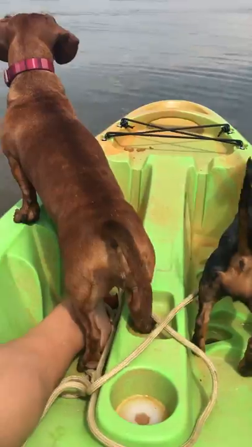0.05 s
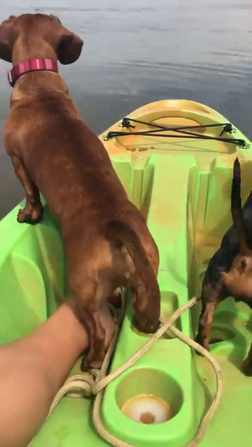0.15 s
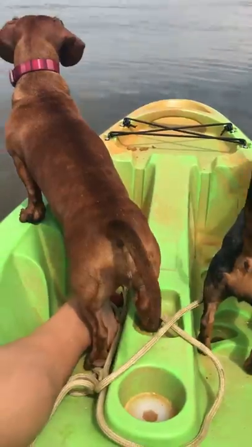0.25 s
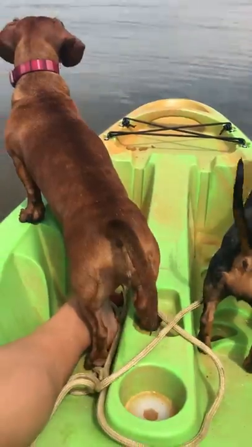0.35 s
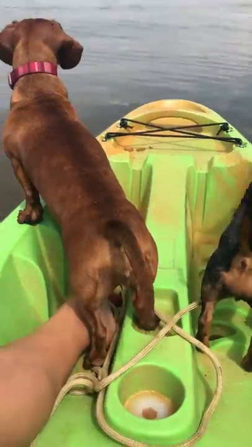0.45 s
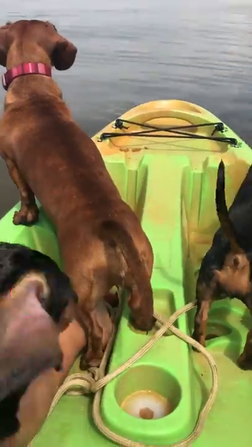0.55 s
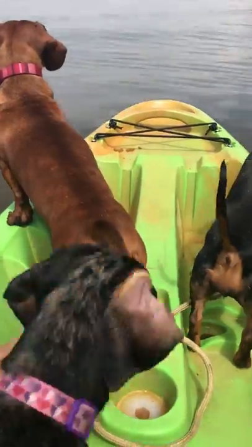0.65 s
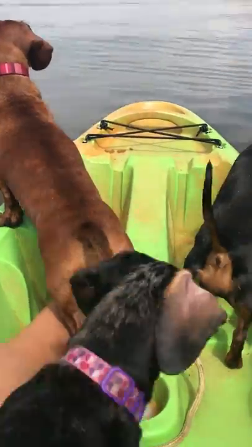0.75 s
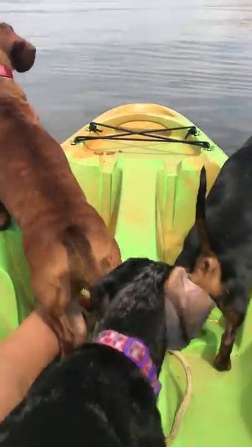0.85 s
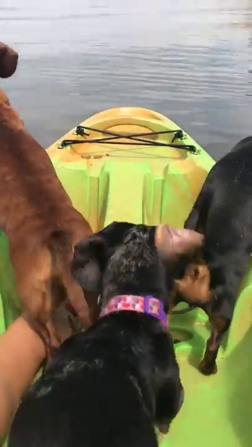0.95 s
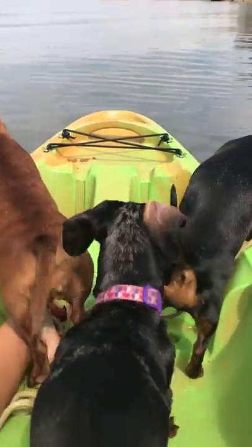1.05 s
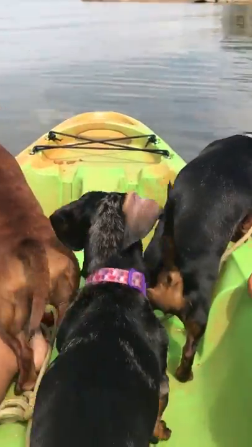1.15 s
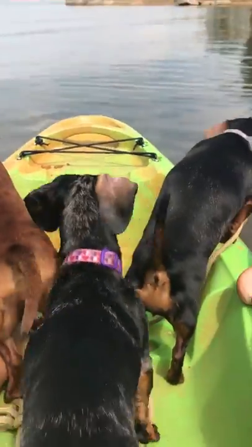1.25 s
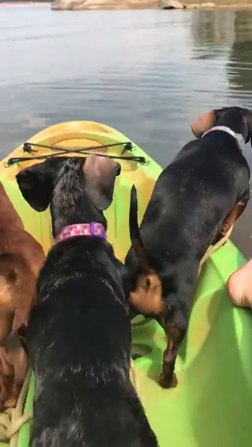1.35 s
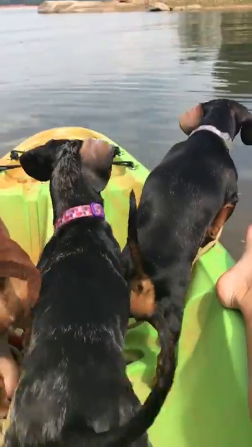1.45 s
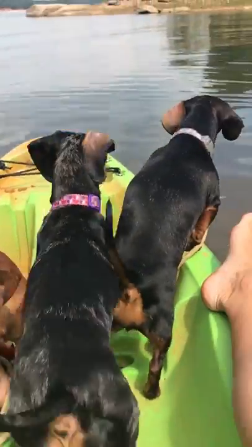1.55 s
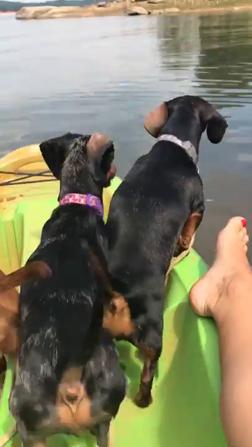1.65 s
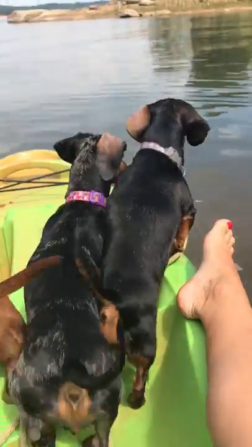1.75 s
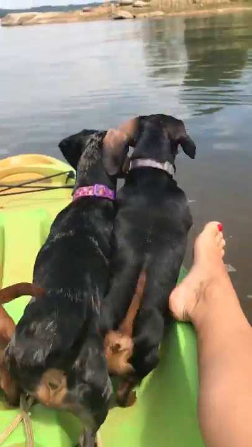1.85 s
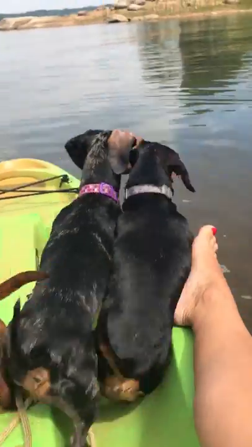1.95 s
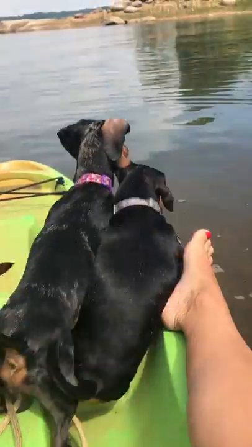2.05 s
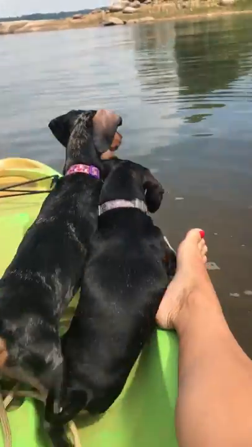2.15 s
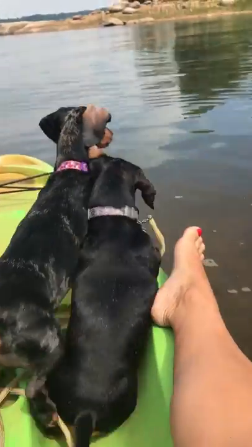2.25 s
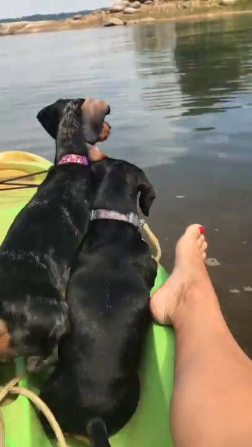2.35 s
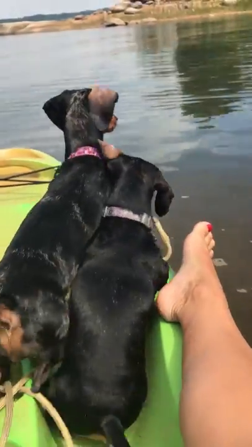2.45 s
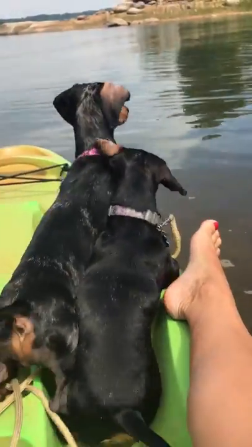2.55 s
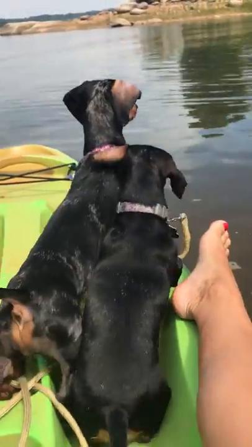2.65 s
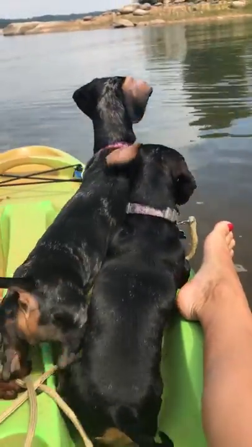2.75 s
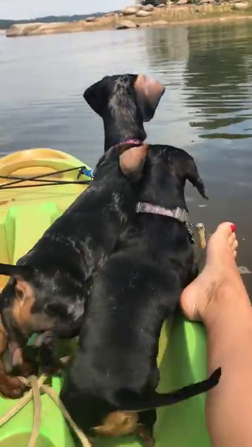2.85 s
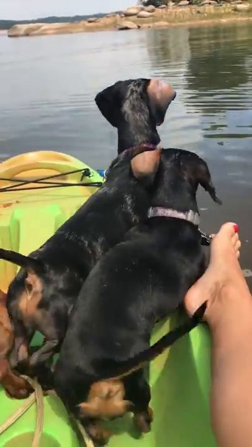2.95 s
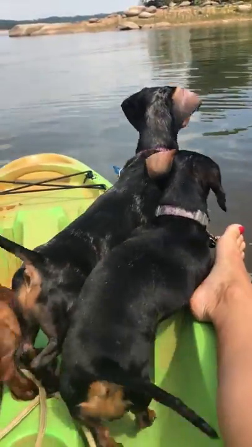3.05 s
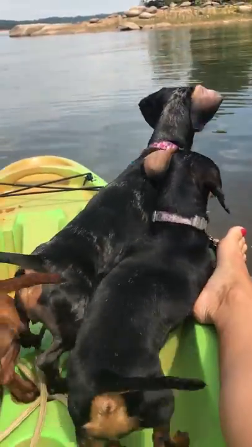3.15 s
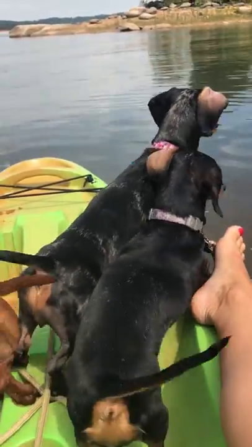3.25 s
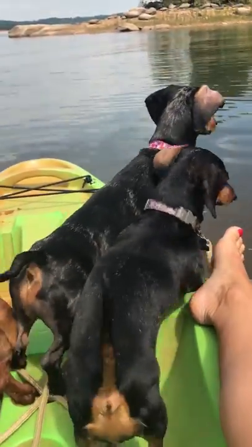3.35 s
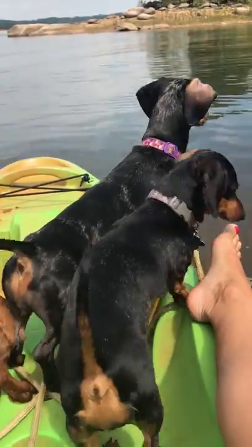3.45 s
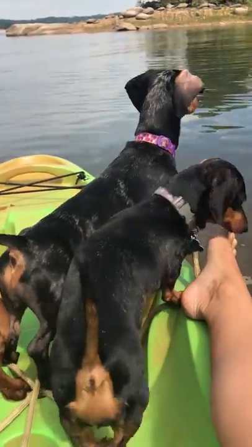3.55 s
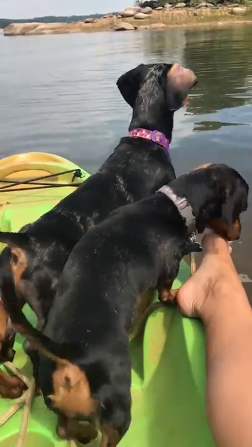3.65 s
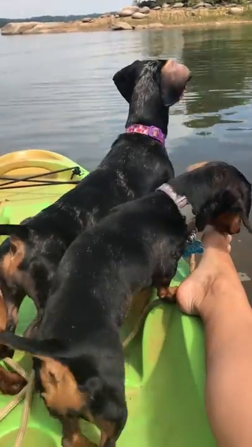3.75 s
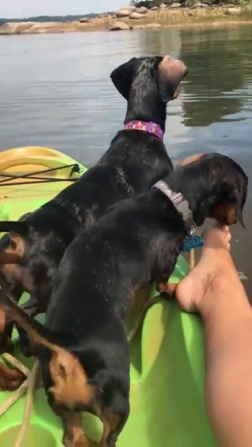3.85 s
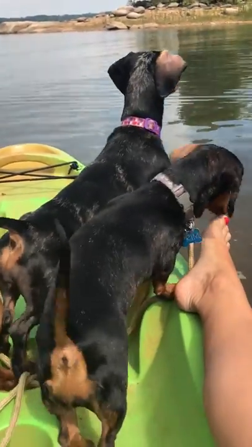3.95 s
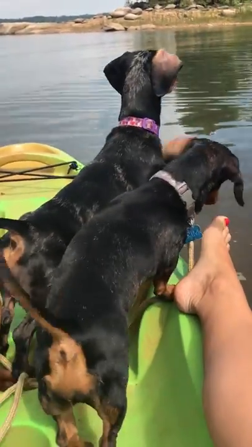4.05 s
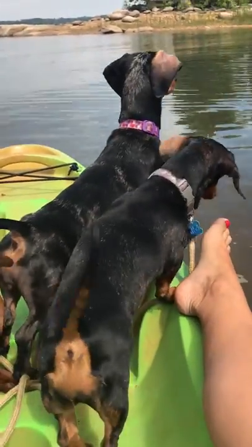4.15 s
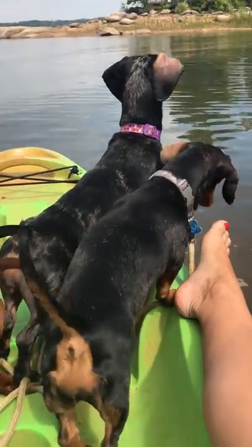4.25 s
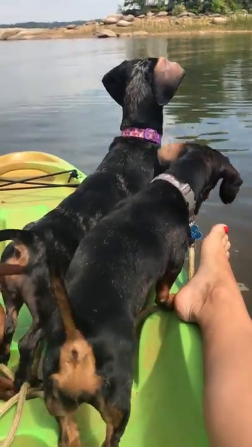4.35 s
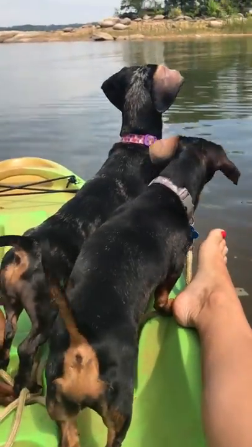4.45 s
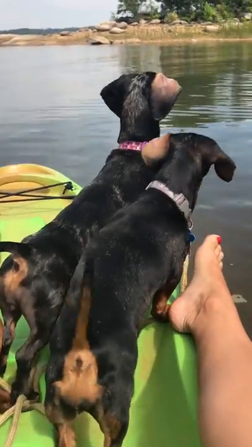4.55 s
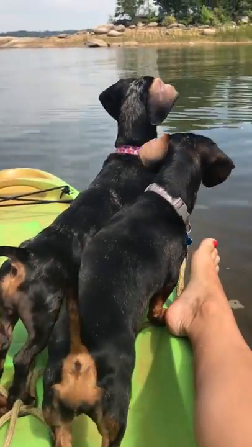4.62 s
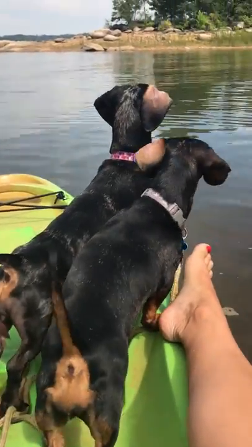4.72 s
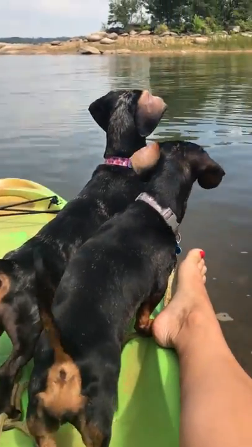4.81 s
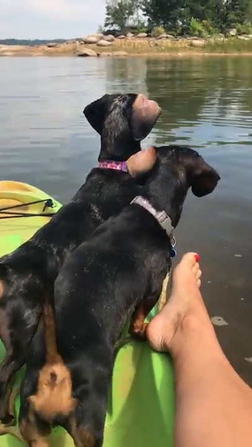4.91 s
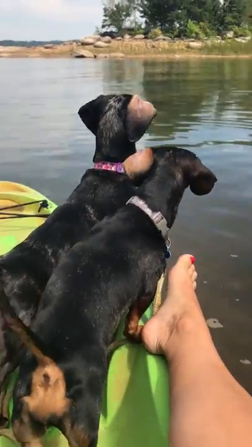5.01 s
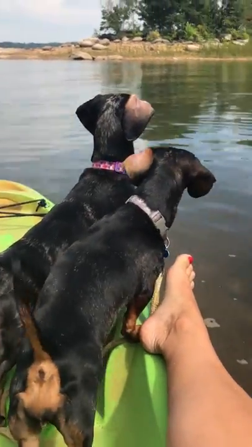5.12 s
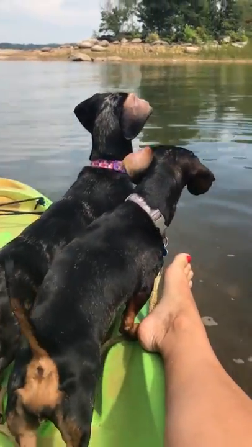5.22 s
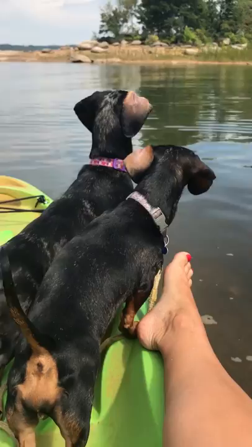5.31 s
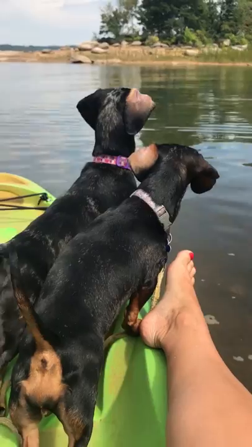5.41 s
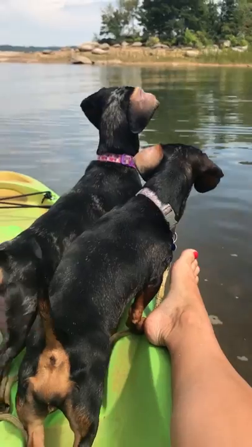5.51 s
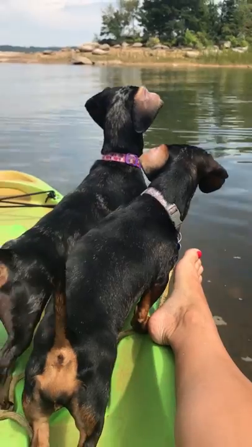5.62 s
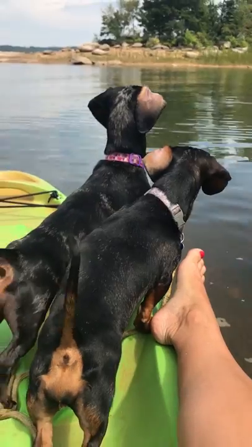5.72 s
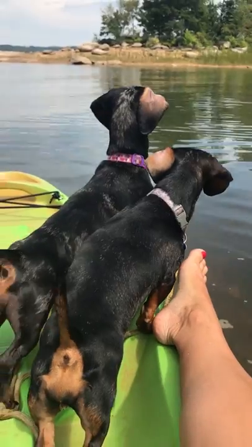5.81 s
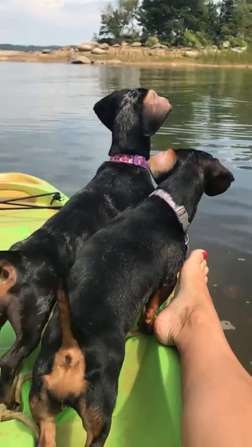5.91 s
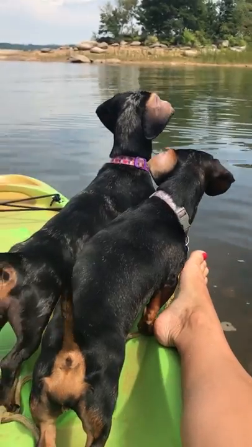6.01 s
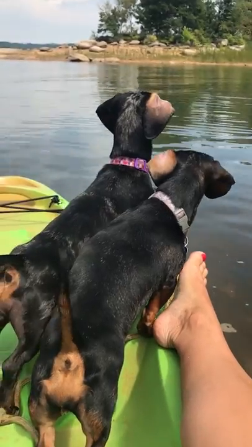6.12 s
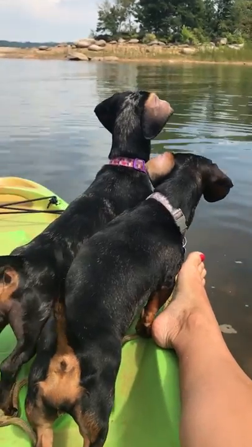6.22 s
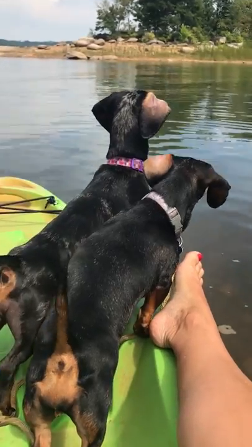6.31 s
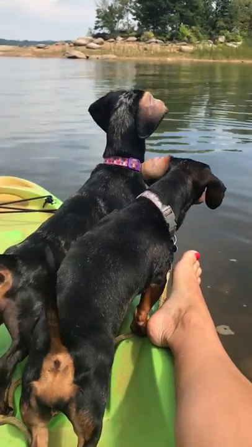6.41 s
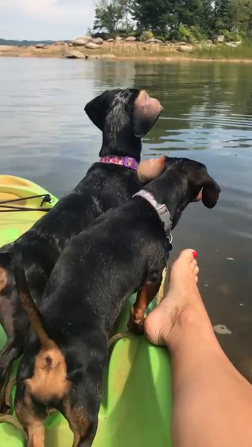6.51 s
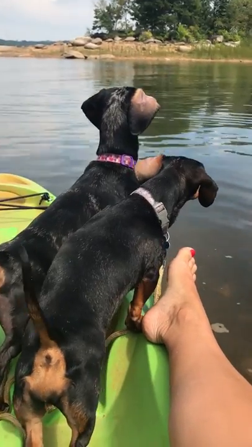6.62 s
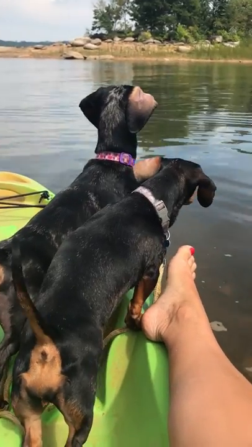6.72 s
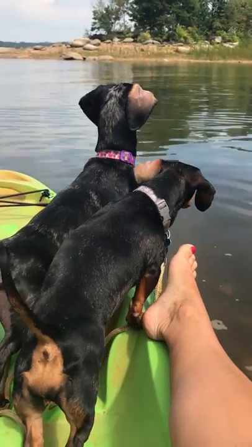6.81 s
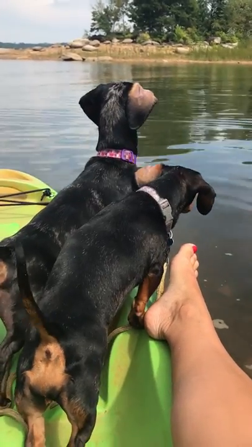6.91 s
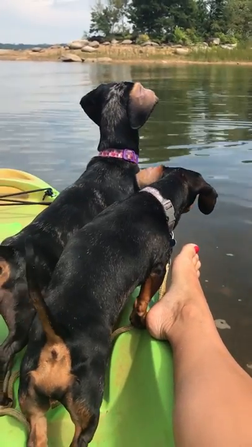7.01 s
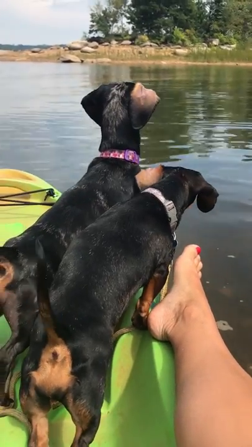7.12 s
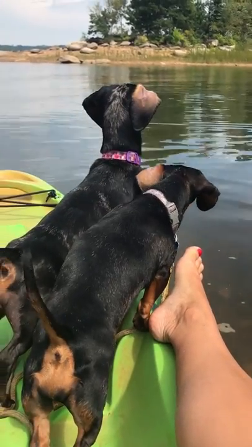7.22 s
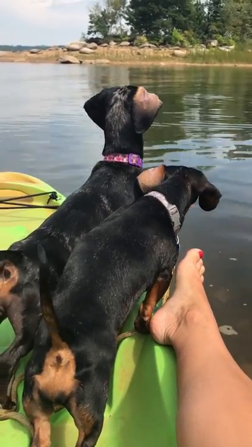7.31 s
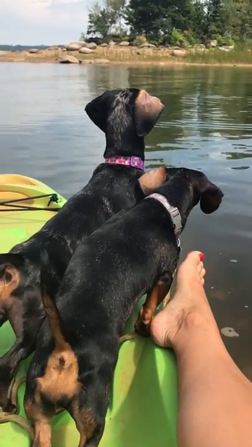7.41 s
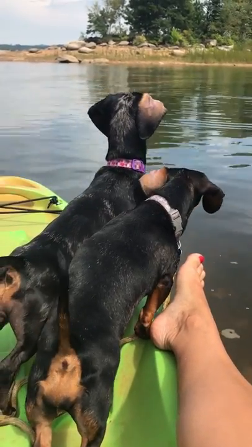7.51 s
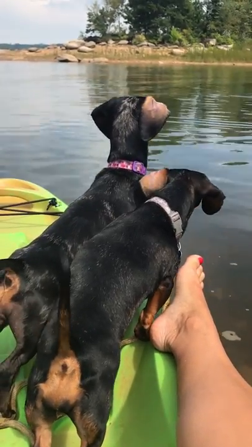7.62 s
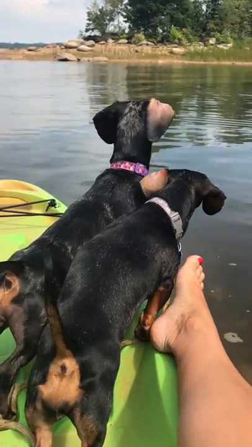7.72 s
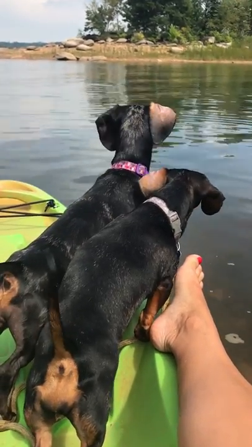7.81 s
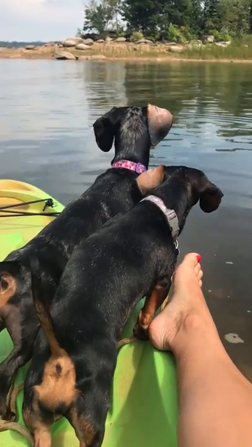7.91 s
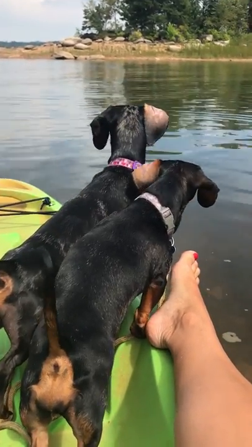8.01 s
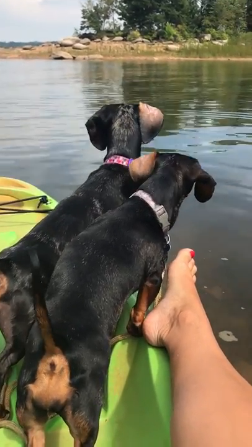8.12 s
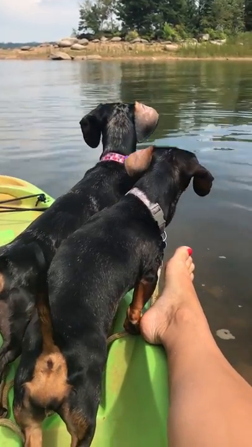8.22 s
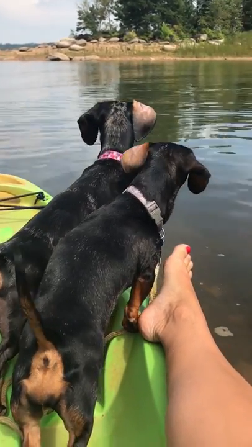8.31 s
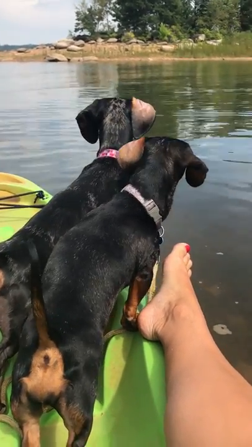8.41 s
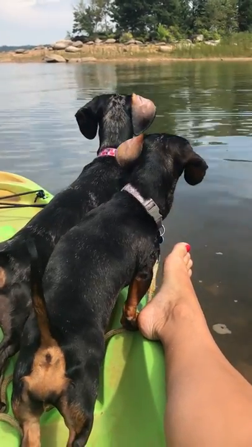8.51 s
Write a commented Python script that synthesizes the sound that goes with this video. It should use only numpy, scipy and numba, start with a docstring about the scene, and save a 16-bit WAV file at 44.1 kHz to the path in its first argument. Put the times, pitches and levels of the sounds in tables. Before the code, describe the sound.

A close phone microphone on a calm lake, dry open air. For the first 0.6 seconds there is a soft distant hush, a faint high insect whine and a few light tag clinks and paw bumps. From about 0.7 to 1.7 seconds, collar tags jingle rapidly, very bright and short, strongest near 0.9 to 1.0, as claws click and paws thump the hollow plastic kayak. A heavy thump lands around 1.6. Until 2.9, claws tick and skid grittily, the hull booms and rumbles, strongest near 2.0, with sparser clinks. Steps and scrapes thin out by 3.6 and nearly stop after 4.3. Then small ripples lap, with a sharp watery tick at 5.6 and plops around 6.5, 7.0 and 7.7 to 7.9. Tiny falling sniffs come at 4.6, 5.2, 7.1 and 8.5, with faint late bumps near 5.6 and 6.1; the insect whine wavers throughout.

```python
"""A calm lake: small dogs shuffle on a hollow plastic kayak, close to a phone's microphone.
Collar tags clink as fluttering high modes, claws tick and skid as gritty noise bursts, paws thump
the hull's low modes; then the dogs settle, with a few late steps, and a dog sniffs in gliding hiss.
All along, ripples plop and tick as short rising tones, an insect whines as a thin tone with its
octave, and the far shore hushes as smooth noise."""
import sys
import numpy as np
from scipy import signal
from scipy.fft import rfft, irfft
from scipy.io import wavfile
from scipy.ndimage import uniform_filter1d
from numba import njit

SR = 44100
rng = np.random.default_rng(int(sys.argv[2]) if len(sys.argv) > 2 else 0)


def field_ratio(decibels):
    """Amplitude ratio for a level in dB (20 dB per decade); scalars and array-likes work."""
    return 10 ** (np.asarray(decibels, dtype=float) / 20)


def master_out(mix):
    """Clip the mix to full scale and print it as 16-bit PCM to the path in sys.argv[1]."""
    frames = np.transpose(np.atleast_2d(mix))
    ceiling = np.clip(frames, -1, 1)
    pcm = np.round(ceiling * 32767).astype(np.int16)
    wavfile.write(sys.argv[1], SR, pcm)


N = 377760
T = np.arange(N) / SR
CAVITY_HZ = 81.4  # the air inside the hull booms most


def add(out, s, sound):
    """Mix a sound in at a moment."""
    i = int(s * SR)
    out[i:i + len(sound)] += sound[:N - i]


def fade(t, t60):
    """Exponential decay of 60 dB in t60."""
    return np.exp(-np.log(1000) * t / t60)


def unit(x):
    """Scale to rms 1."""
    return x / np.sqrt(np.mean(x ** 2))


def colour(x, points):
    """Shape by (frequency [Hz], level [dB]) points on a log-frequency axis; rms 1."""
    hz, db = np.transpose(points)
    f = np.arange(len(x) // 2 + 1) * SR / len(x) + 1
    gain = field_ratio(np.interp(np.log(f), np.log(hz), db))
    return unit(irfft(rfft(x) * gain, len(x)))


def walk(rate):
    """Random levels held 1 / rate s and slewed twice; spread near 1."""
    k = int(SR / rate)
    held = np.repeat(rng.standard_normal(N // k + 1), k)
    return 1.3 * uniform_filter1d(uniform_filter1d(held, k), k)[:N]


def curve(table, index):
    """One column of a table as gain over time, silent after its end."""
    rows = np.array(table)
    return field_ratio(np.interp(T, rows[:, 0], rows[:, index], right=-120))


def grains(spread_db, size):
    """Noise in short steps of size samples, a few of them much stronger."""
    steps = np.minimum(rng.exponential(size=N // size + 1), 5)
    return rng.standard_normal(N) * field_ratio(spread_db * steps).repeat(size)[:N]


@njit
def svf(x, hz, q):
    """State-variable band-pass with a moving centre."""
    y, b, l = np.empty(len(x)), 0., 0.
    for i in range(len(x)):
        g = np.tan(np.pi * hz[i] / SR)
        v = (b + g * (x[i] - l)) / (1 + g * (g + 1 / q))
        b, l, y[i] = 2 * v - b, l + 2 * g * v, v / q
    return y


def shore(level_db=-52.5, treble_db=-3):
    """Far water and air: a hush that drifts a little; the boat's rocking makes the bass come and go."""
    # spectrum of the hush: (frequency [Hz], relative level [dB per Hz])
    hush_spectrum = [(25, 1.5), (60, 5.5), (124, 1), (259, -6.5), (470, -5.5), (979, -5.5), (2040, -13.5),
                     (3230, -16.5), (4860, -19), (10400, -31), (14400, -29.5), (16500, -36)]
    drift_db = .7 * walk(3)
    hush = colour(rng.standard_normal(N), hush_spectrum)
    bass = signal.sosfilt(signal.butter(2, 300, fs=SR, output="sos"), hush)
    treble = field_ratio(treble_db) * (hush - bass)
    return field_ratio(level_db + drift_db) * (treble + bass * field_ratio(2.6 * walk(14)))


def insect(wing_hz=3180, octave_db=-11):
    """A thin wing tone with its octave comes and goes; twice a peep glides a little above it."""
    # insect flight, before the flicker: (time [s], wing tone level [dB])
    flight = [(0, -71), (4.6, -79), (5.7, -77), (5.95, -70), (6.3, -79), (6.8, -74), (7.3, -81), (7.9, -77),
              (8.2, -72.5), (8.57, -76)]
    # thin gliding tones, before the flicker:
    # (time [s], length [s], peak level [dB], start [Hz], end [Hz])
    peeps = [(4.98, .22, -65.5, 3430, 3250), (8.28, .26, -71.5, 3310, 3420)]
    phase = 2 * np.pi * np.cumsum(wing_hz * (1 + 0.000902 * walk(6))) / SR
    wing = np.sin(phase) + field_ratio(octave_db) * np.sin(2 * phase)
    out = curve(flight, index=1) * np.sqrt(2) * wing
    for s, length, db, start_hz, end_hz in peeps:
        u = np.arange(int(length * SR)) / int(length * SR)
        glide = np.cumsum(start_hz + (end_hz - start_hz) * u ** 2) / SR
        swell = np.sqrt(np.sin(np.pi * np.sqrt(u)))
        add(out, s, field_ratio(db) * np.sin(2 * np.pi * glide) * swell)
    return out * field_ratio(2.5 * walk(25))  # the level flickers


def shuffle(flicker_db=5.0, scrape_db=-0.5, scrape_hz=1900, roam_octaves=0.97, stutter_db=5):
    """Pads and fur rub in grains, claws drag in stutters; shifting weight keeps the hull rumbling."""
    # shuffling, before flicker: (time [s], pad rustle level [dB], hull rumble level [dB])
    shuffling = [(0.0, -65, -54.5), (0.66, -57, -59), (1.18, -55, -51.5), (1.7, -52.5, -50.5),
                 (1.98, -45.5, -38), (2.25, -53, -49), (3.08, -53.5, -45), (3.55, -59, -54.5),
                 (4.4, -72, -71)]
    # spectrum of the rubbing: (frequency [Hz], relative level [dB per Hz])
    rub_spectrum = [(300, -12), (800, 7.5), (2500, 0), (5000, -0.5), (9000, -6.5), (15500, -5.5)]
    rustle = colour(grains(3, size=90), rub_spectrum) * field_ratio(flicker_db * walk(30.06))
    # the dragging claws pass over changing spots
    spot_hz = np.clip(scrape_hz * 2 ** (roam_octaves * walk(28)), 0, SR / 4)
    scrape = svf(grains(2.8, size=40), spot_hz, 1.87) * field_ratio(stutter_db * walk(60))
    rustle = rustle + field_ratio(scrape_db) * unit(scrape)
    rumble = colour(rng.standard_normal(N), [(30, -11.0), (70, 4.0), (150, -9.5), (320, -6.5),
                                             (600, -19.5), (2000, -46.0)])
    rumble = rumble * field_ratio(flicker_db * walk(18))
    return curve(shuffling, index=1) * rustle + curve(shuffling, index=2) * rumble


def ripples(rate=190, small_db=-59.5, spread_db=4.6, cycles=26, glide=5, fizz_db=-67):
    """Trapped bubbles: short rising tones, a few strong among many faint (rate per s), and a soft fizz."""
    # clear plops and short ticks: (time [s], level [dB], starting frequency [Hz])
    plops_and_ticks = [(5.259, -38, 2400), (5.321, -43, 1388), (5.588, -28, 3600), (6.485, -40.5, 1150),
                       (6.531, -39, 950), (6.948, -36.5, 2390), (7.085, -37, 1850), (7.683, -36, 1600),
                       (7.766, -38.5, 960), (7.789, -38.5, 1070), (7.849, -42, 1095), (7.935, -43, 2150)]
    # how busily the ripples lap: (time [s], level on top of the faint bubbles and fizz [dB])
    lapping = [(0, -8), (4.5, 4.5), (5.4, -2), (6.2, 8), (6.6, 0.5), (7.1, 5), (7.75, 4), (8.1, 2),
               (8.57, -15)]
    out, t = np.zeros(N), T[:1500]
    cluster_db = 3.5  # bubbles come in clusters
    busy_db = np.interp(T, *np.transpose(lapping)) + cluster_db * walk(9.6)
    moment, strength, pitch = rng.random((int(rate * N / SR), 3)).T
    hz = 650 * 2 ** (2.7 * pitch)
    size_db = np.minimum(-spread_db * np.log(strength), 13)
    # bubbles far from 1500 Hz are fainter
    faint_db = small_db + size_db + busy_db[(moment * (N - 1)).astype(int)] - 2.2 * np.log2(hz / 1500) ** 2
    faint = np.c_[moment * T[-1], faint_db, hz]
    for s, db, hz in np.r_[plops_and_ticks, faint]:
        tone = np.sin(2 * np.pi * hz * (t + glide * t ** 2))
        add(out, s, field_ratio(db) * tone * fade(t, cycles / hz) * np.minimum(t / 0.0014, 1))
    fizz = colour(grains(3.3, size=220), [(900, -8), (2400, 0), (5000, -13), (15000, -28)])
    return out + field_ratio(fizz_db + busy_db) * fizz


def tags(scatter_db=9, drift=0.0026, rise_s=0.0011, flutter_db=7, crack_db=-11, crack_t60=0.035,
         bounce_db=-7, bounce_s=.014, weak_t60=0.9, split=.008):
    """Each clink cracks, bounces on its ring and sounds the same modes until the next contact."""
    # tag strikes: (time [s], level [dB], lean of the second mode over the first [dB],
    # edge: level of the other modes [dB], t60 of the two main modes until fur damps them [s])
    strikes = [(.2091, -42.5, 30, -13, 0.05), (.3068, -38.5, 3, -5, 0.071), (.3368, -24, -14, -40, 0.031),
               (.6769, -30.5, -23, -17, 0.017), (.6856, -30, -20, -12, 0.014),
               (.7493, -33.5, -13, -16, 0.047), (.8045, -35, -8, -1, 0.15), (.8329, -34.5, -17, -24, 0.11),
               (.9215, -11, 7.5, -2, 0.014), (.9396, -25.5, -6, 0, 0.11), (.9942, -7, -34.5, -28, 0.021),
               (1.0144, -21, -3, -22, 0.02), (1.0351, -40, 3, -5, 0.0495), (1.0964, -23, -16, -10, 0.039),
               (1.1165, -28.5, -12, -20, 0.057), (1.173, -26.5, -5, -15, 0.04),
               (1.2117, -19, -4.5, 4, 0.02), (1.2344, -29, -10, -5, .055), (1.2458, -34, 15, 8, 0.044),
               (1.2601, -28, -21, 2, 0.14), (1.2733, -23, 7, -8, 0.043), (1.2962, -36.5, 19, 3, 0.11),
               (1.3269, -19, 30, 0, 0.022), (1.3625, -15, -18.5, -12, 0.04), (1.3837, -26, -11, -24, 0.018),
               (1.3998, -20, 10, -6, 0.023), (1.5033, -43, 1, 4.5, 0.1), (1.6369, -24, 0, 7, 0.033),
               (1.6536, -36, 19, 9, 0.052), (1.6867, -39, -4, -10, 0.066), (1.7211, -23, -4, 9.5, 0.025),
               (1.935, -39, -18.5, -27, 0.073), (2.066, -37.5, -3, 13, 0.056), (2.2252, -31.5, 9, 2, 0.04),
               (2.2467, -28, -19, -22, 0.012), (2.266, -53, -1, 10, 0.27), (2.3002, -26, -4, 3.5, 0.053),
               (2.336, -43, 14, -4, 0.13), (2.4016, -36, -17, -24, 0.031), (2.433, -45, 5, 22, 0.024),
               (2.6988, -22, 29, 1, 0.031), (3.0324, -35, -36, -38, 0.033), (3.0669, -47, -15, 0, 0.053),
               (3.4765, -31, -34.5, -16.5, 0.032), (3.9856, -48, 15, -13, .024)]
    # the three main modes: nominal frequency [Hz]
    main_hz = [11935, 10410, 15130]
    # weaker modes: (nominal frequency [Hz], level before random scatter [dB])
    weak_modes = [(6100, -7.5), (13860, -5.5), (14530, -15.5), (3770, -14)]
    low_hz, low_db = 8520, -2  # sounds along with the third mode, dB beside it before scatter
    # as the dog turns away, the third mode gives way to the weaker ones
    turn_s, turn_db_per_s = 0.88, 14.5
    out, t = np.zeros(N), T[:SR // 7]
    chance = rng.standard_normal((len(strikes), 4, 8))
    weak_hz, weak_db = np.transpose(weak_modes)
    crack = colour(grains(2.16, size=50), [(3000, -1.5), (7000, 10.5), (11000, 21), (16000, 4.5)])
    flutter = np.array([walk(220) for _ in range(8)])
    for k, (s, strike_db, lean_db, edge_db, t60) in enumerate(strikes):
        detune, scatter, phase, uneven = chance[k]
        now = slice(int(s * SR), int(s * SR) + len(t))
        turned_db = turn_db_per_s * (s - turn_s)
        third_db = edge_db - max(turned_db, 0)
        main_db = strike_db + np.array([min(-lean_db, 0), min(lean_db, 0), third_db])
        rest_db = strike_db + edge_db + min(turned_db, 0)
        minor_db = np.r_[main_db[2] + low_db, rest_db + weak_db] - scatter_db * abs(scatter[3:])
        hz = np.r_[main_hz, low_hz, weak_hz] * (1 + drift * detune)
        db = np.r_[main_db, minor_db]
        decay = max(t60, .01) * np.where(np.arange(len(hz)) < 2, 1, weak_t60)[:, None]
        # an uneven tag rings each mode as a close pair that beats
        turns = 2 * np.pi * np.outer(hz, t) + 3 * phase[:, None]
        partner = np.tanh(uneven[:, None]) * np.sin(turns * (1 - split * phase[::-1, None]))
        modes = (np.sin(turns) + partner) * fade(t, decay)
        # the strike is firm; then each mode flutters on its own as the tag swings and grazes its ring
        swing_db = flutter_db * flutter[:, now] * np.minimum(t / 0.007, 1)
        ring = field_ratio(db) @ (modes * field_ratio(swing_db))
        until = strikes[k + 1][0] - s if k + 1 < len(strikes) else 1
        # three ever weaker bounces at uneven gaps
        later = t - np.cumsum(bounce_s * (.5 + abs(uneven[:3])))[:, None]
        bounces = field_ratio(bounce_db * np.arange(1, 4)) @ ((later > 0) * fade(abs(later), crack_t60 / 2))
        hit = field_ratio(max(db) + crack_db) * crack[now] * (fade(t, crack_t60) + bounces)
        stopped = ring * fade(np.maximum(t - until, 0), 0.019)
        add(out, s, (stopped + hit) * np.minimum(t / rise_s, 1))
    return out


def paws(width_octaves=0.92, scatter_db=3, bloom=0.23, slap_cycles=2.3, slap_db=7, knock_t60=0.073,
         cavity_db=5, deck_db=5):
    """The pad slaps, the stiff deck knocks, then hull modes near the centre bloom, low ones last."""
    # paw thumps: (time [s], level [dB], centre frequency [Hz])
    thumps = [(.253, -41.5, 248), (0.318, -35, 286), (0.56, -38, 427), (.856, -28, 141),
              (.885, -26.5, 91.5), (.921, -22, 273), (.952, -24, 267), (.972, -32.5, 107.6),
              (1.106, -36.5, 256), (1.152, -26, 116), (1.228, -37.5, 248), (1.296, -34, 212),
              (1.341, -28, 487), (1.405, -29, 113), (1.507, -27.5, 238), (1.56, -28.5, 230),
              (1.605, -25, 141), (1.628, -14.5, 147), (1.689, -27, 106), (1.788, -26.5, 161),
              (1.92, -21, 210), (1.953, -34, 195), (1.978, -22.5, 234), (2.04, -23, 154), (2.122, -18, 186),
              (2.371, -31.5, 241), (2.404, -35, 149), (2.524, -23, 260), (2.612, -25, 146),
              (2.624, -27, 210), (2.812, -34, 330), (2.851, -17, 250), (3.165, -32, 272),
              (3.233, -30.5, 296), (3.262, -20, 252), (3.659, -37.5, 70), (3.817, -37.5, 170),
              (4.567, -46.5, 73.2), (5.648, -38, 81), (6.103, -41, 207), (6.164, -41.5, 77.4)]
    # hull modes: (nominal frequency [Hz], t60 [s])
    hull_modes = [(60.7, 0.516), (CAVITY_HZ, 0.33), (100, 0.2), (145, 0.17), (170, 0.19), (232, 0.168),
                  (280, 0.12), (335, 0.12), (430, 0.11), (560, 0.086), (825, 0.045), (630, 0.11),
                  (1200, 0.093)]
    # knock beside a -12.5 dB thump centred on 200 Hz; stiffer spots and harder steps knock more
    knock_db, knock_db_per_octave, knock_per_db = -6.5, 3.5, .5
    out, t = np.zeros(N), T[:SR // 3]
    hz, t60 = np.transpose(hull_modes)[:, :, None]
    chance = rng.standard_normal((len(thumps), 3, len(hull_modes), 1))
    deck = colour(rng.standard_normal(N), [(250, -8.5), (600, -2), (1000, -0.5), (1600, -15), (5000, -37.0)])
    for (s, db, centre), (size, tune, phase) in zip(thumps, chance):
        mode_db = scatter_db * size + cavity_db * (hz == CAVITY_HZ) + deck_db * (hz > 560)
        gain = field_ratio(mode_db) / (1 + (np.log2(hz / centre) / width_octaves) ** 2)
        modes = np.sin(2 * np.pi * hz * (1 + 0.044 * tune) * t + 1.55 * phase)
        ring = gain * modes * fade(t, t60) * (1 - np.exp(-t * hz / bloom))
        ring = ring.sum(axis=0) / np.sqrt(np.sum(gain ** 2))
        slap = field_ratio(slap_db) * np.sin(2 * np.pi * centre * t) * fade(t, slap_cycles / centre)
        beside_db = knock_db + knock_db_per_octave * np.log2(centre / 200) + knock_per_db * (db + 12.5)
        knock = field_ratio(beside_db) * deck[int(s * SR):][:len(t)] * fade(t, knock_t60)
        knock = knock * np.minimum(t / 0.00068, 1)
        add(out, s, field_ratio(db) * (ring + slap + knock))
    return out


def claws(width_octaves=1.0, grit_db=3.0, lumps_db=3, skid_ms=90, tail=1.04):
    """A claw scrapes over pebbled plastic in a gritty burst; each spot has its own resonances."""
    # claw ticks and skids: (time [s], level [dB], centre frequency [Hz], length scale [ms], 1 at least)
    touches = [(0.3169, -40.5, 2620, 6.1), (0.64, -40, 5100, 10.4), (.725, -45.5, 6000, 12),
               (0.859, -29, 4800, 4), (0.8711, -21.5, 4940, 2.9), (0.876, -29, 3660, 4.8),
               (0.917, -24.5, 4900, 13.3), (0.94, -38.5, 6500, 27), (0.971, -35, 4840, 8),
               (0.991, -37, 9100, 5.2), (1.013, -32, 7780, 10.4), (1.035, -44, 8000, 28),
               (1.105, -42, 4060, 28), (1.171, -39, 3720, 14), (1.204, -26, 5870, 4),
               (1.233, -35, 8050, 4.7), (1.326, -36.5, 5400, 13.6), (1.344, -32.5, 4350, 9.4),
               (1.354, -33, 6960, 13), (1.3955, -27.5, 5770, 6.4), (1.474, -27, 8200, 7.5),
               (1.581, -39, 4600, 6.3), (1.611, -29, 4960, 8.5), (1.6293, -24.5, 4700, 9.5),
               (1.7265, -34, 5430, 7.5), (1.79, -35, 5770, 11), (1.812, -36.5, 2480, 5.6),
               (1.862, -33, 2700, 15.4), (1.882, -35, 1140, 13.7), (1.883, -26.5, 3760, 3.5),
               (1.918, -20, 4400, 7), (1.978, -26.5, 3670, 5.1), (2.015, -32, 4370, 7.2),
               (2.0309, -16, 6040, 2.6), (2.044, -29.5, 1450, 6.8), (2.1222, -31, 1300, 2.1),
               (2.136, -37.5, 3550, 14), (2.149, -33, 5400, 6.8), (2.297, -33, 6200, 3.7),
               (2.3234, -37, 4360, 6.2), (2.374, -19, 5100, 3.4), (2.3983, -38, 4500, 5.8),
               (2.464, -39.5, 4780, 3.8), (2.5122, -24.5, 4300, 1.9), (2.5181, -18, 4270, 11.4),
               (2.54, -42.5, 950, 39), (2.695, -41, 5700, 3.7), (2.763, -34.5, 1420, 34),
               (2.8512, -40, 1280, 2.2), (2.972, -44.5, 3950, 9.2), (3.051, -31.5, 3600, 5.7),
               (3.075, -42, 4000, 5.3), (3.1045, -39, 5500, 2.2), (3.132, -32, 3340, 31.5),
               (3.229, -29, 4200, 3.6), (3.253, -32.5, 1900, 34.7), (3.313, -38, 9000, 3.2),
               (3.335, -37.5, 3770, 11.3), (3.476, -45, 11000, 3.2), (3.502, -37.5, 3760, 4),
               (3.52, -26.5, 7300, 0.96), (3.533, -42, 2700, 32.6), (3.814, -39.5, 1730, 8),
               (3.985, -37, 6500, 2.3), (4.025, -48.5, 2920, 16), (4.197, -46.5, 7000, 2),
               (4.283, -40, 4000, 0.74), (5.577, -47, 3500, 4.5), (6.091, -55.5, 4400, 60)]
    out, t = np.zeros(N), T[:6000]
    chance = rng.standard_normal((len(touches), 3, len(t)))
    f = np.arange(len(t) // 2 + 1) * SR / len(t) + 1
    for (s, db, hz, ms), (noise, grit, spot) in zip(touches, chance):
        # a tick starts quickly on one spot; a long skid swells slowly and smears the resonances
        skid = min(ms / skid_ms, .6)
        lumps = field_ratio((1.5 - skid) * lumps_db * unit(uniform_filter1d(spot[:len(f)], size=70)))
        shape = lumps / (1 + (np.log2(f / hz) / (width_octaves + skid)) ** 2)
        shape = shape / np.hypot(1, f / (3.1 * hz))
        gritty = noise * field_ratio(grit_db * unit(uniform_filter1d(grit, size=30)))
        burst = irfft(rfft(gritty) * shape)
        u, rise = t * 1000 / max(ms, 1), 0.43 + skid
        swell = np.sin(np.pi / 2 * np.minimum(u / rise, 1)) ** 2
        swell = swell * np.exp(-tail * (1 + 4 * skid) * np.maximum(u - rise, 0) ** 1.3)
        level = field_ratio(db) * np.linalg.norm(swell) / np.linalg.norm(burst * swell)
        add(out, s, level * burst * swell)
    return out


def sniffs(q=3.2, tail_db=7, spread=.08):
    """Air through the nostrils: a grainy hiss in two neighbouring resonances that fall and fade."""
    # sniffs: (time [s], level before the fades [dB], nominal start [Hz], nominal end [Hz], length [s])
    breaths = [(4.632, -49.5, 4700, 2300, 0.081), (5.152, -53.5, 5300, 1200, 0.074),
               (7.117, -52.5, 4970, 1900, 0.08), (8.486, -51.5, 4880, 1500, 0.064)]
    out = np.zeros(N)
    for s, db, start_hz, end_hz, length in breaths:
        u = np.arange(int(length * SR)) / int(length * SR)
        fall = (end_hz / start_hz) ** (u ** 2.6)
        hz = start_hz * fall * (1 - .15 * fade(u, 1))  # a quick rise, then the fall
        hiss = grains(1.1, size=60)[:len(u)]
        air = np.zeros(len(u))
        for side in (1 - spread, 1 + spread):
            air += svf(svf(svf(hiss, hz * side, q), hz * side, q), hz * side, q)
        add(out, s, field_ratio(db) * unit(air) * np.sin(np.pi * u) ** 0.5 * field_ratio(-tail_db * u ** 2))
    return out


def scene():
    """All sources at one microphone, out in the open."""
    dogs = tags() + paws() + claws() + shuffle() + sniffs()
    lake = shore() + insect() + ripples()
    return (dogs + lake)[None]


def low_pass(x):
    """Removes everything above the highest recorded frequency."""
    return signal.sosfilt(signal.butter(12, 16990, fs=SR, output="sos"), x)


def record(dry):
    """The small microphone loses the deepest bass; the phone cuts the top."""
    x = signal.sosfilt(signal.butter(2, 45, "high", fs=SR, output="sos"), dry)
    x = signal.sosfilt(signal.ellip(10, .5, 40, 15900, fs=SR, output="sos"), x)
    return low_pass(x)


dry = scene()
out = record(dry)
master_out(out)
```